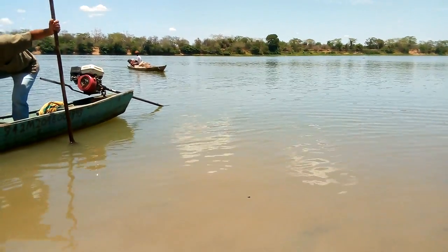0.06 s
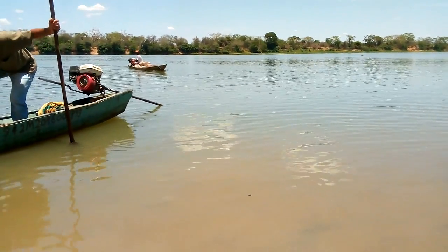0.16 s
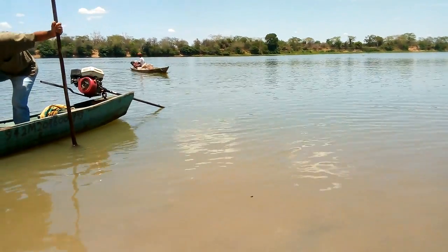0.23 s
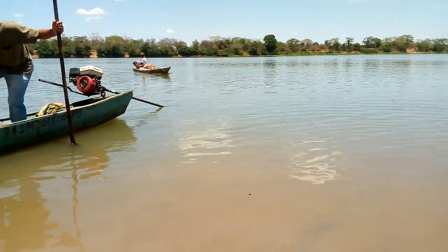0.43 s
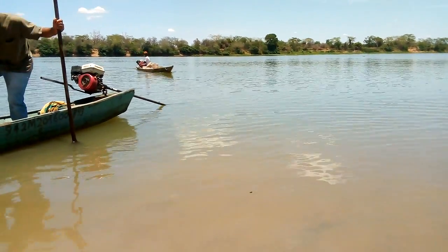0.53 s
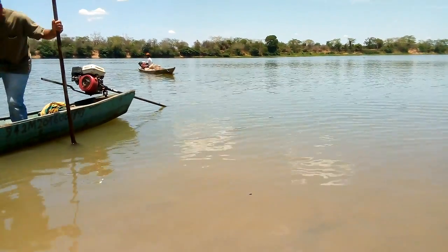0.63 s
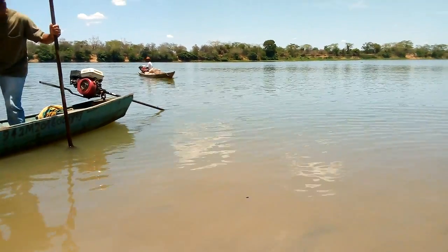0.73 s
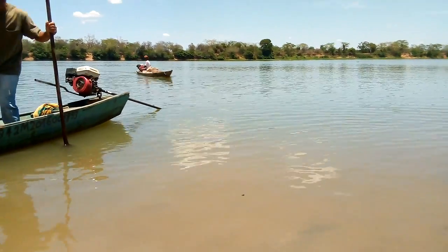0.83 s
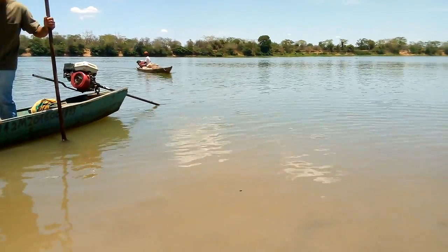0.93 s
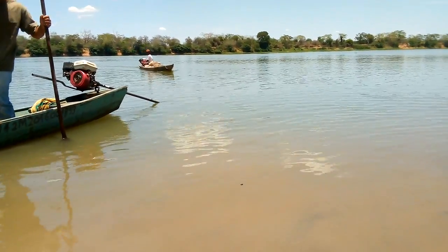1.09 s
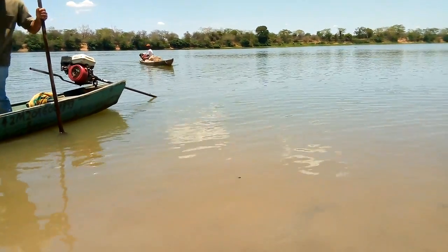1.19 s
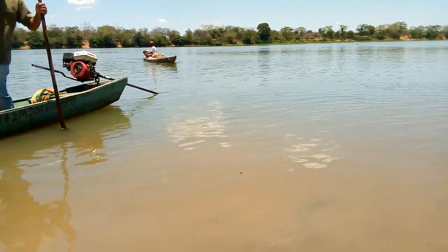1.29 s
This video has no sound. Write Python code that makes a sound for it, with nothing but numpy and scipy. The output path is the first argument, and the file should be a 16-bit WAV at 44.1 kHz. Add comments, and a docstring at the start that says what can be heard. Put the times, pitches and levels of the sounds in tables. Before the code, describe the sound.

A wooden pole knocks a canoe hull, bounces and clatters for a third of a second, then stops; a small motor putters faintly far off, cloth rustles and ticks close to the left of the microphone, outdoors.

```python
"""A wooden pole knocks and bounces against a canoe's hull: short forces excite decaying modes of both. Far out
on the river a small single-cylinder motor putters: puffs of noise ring its casing. Close to the two microphone
ports, mostly left, cloth rustles and ticks: grainy noise and brief rings. A smooth hiss of shaped noise and a
faint bass rumble of the rocking hull lie underneath."""
import sys
import numpy as np
from scipy import signal
from scipy.fft import rfft, irfft
from scipy.io import wavfile
from scipy.ndimage import uniform_filter1d

SR = 44100
rng = np.random.default_rng(int(sys.argv[2]) if len(sys.argv) > 2 else 0)


def generate_wav(signal):
    """Clip the signal to [-1, 1] and save it as 16-bit WAV at the path in sys.argv[1]."""
    frames = np.transpose(np.atleast_2d(signal))
    scaled = np.clip(frames, -1, 1) * 32767
    pcm = np.round(scaled).astype(np.int16)
    wavfile.write(sys.argv[1], SR, pcm)


def to_linear_factor(level_db):
    """Convert decibel levels (scalar or array-like) to linear amplitude factors."""
    exponent = np.asarray(level_db, float) / 20
    return 10 ** exponent


N = 59535  # samples


def noise():
    """White noise: equal mean power at every frequency, unit variance."""
    return rng.standard_normal(N)


def partly_shared_noise(independent, length=N):
    """Partial coherence: both ports share one noise and each adds its own."""
    return rng.standard_normal(length) + independent * rng.standard_normal((2, length))


def band(x, hz, width):
    """Resonant filtering: a two-pole band-pass with gain 1 at the centre."""
    return signal.lfilter(*signal.iirpeak(hz, hz / width, SR), x)


def double_band(x, hz, width1, width2):
    """Cascaded resonance: two band-passes at one centre give steeper skirts."""
    return band(band(x, hz, width1), hz, width2)


def ring(x, hz, t60):
    """Modal decay: a unit impulse starts one damped sinusoid of amplitude 1."""
    r, w = np.exp(-np.log(1000) / (t60 * SR)), 2 * np.pi * hz / SR
    return signal.lfilter([0, r * np.sin(w)], [1, -2 * r * np.cos(w), r * r], x)


def pan(x, db):
    """Interchannel level difference: left minus right in dB, split evenly."""
    return x * to_linear_factor(np.array([[db], [-db]]) / 2)


def fade(t0, t60):
    """Exponential decay: an envelope that jumps to 1 at t0 and falls 60 dB in t60 s."""
    t = np.arange(N) / SR - t0
    return (t >= 0) * np.exp(-np.log(1000) * np.maximum(t, 0) / t60)


def curve(x, rows, log=False):
    """Piecewise-linear interpolation of a two-column table, over log of column 1 if asked."""
    r = np.array(rows, float)
    return np.interp(x, np.log(r[:, 0]) if log else r[:, 0], r[:, 1])


def push(t0, ms):
    """Contact force: a bell of unit area centred on t0; a longer push is duller."""
    p = np.exp(-((np.arange(N) / SR - t0) * 1000 / ms) ** 2 * 2)
    return p / p.sum()


# spectral density of the background hiss at each port; columns: frequency_hz, density_db_per_hz
HISS_LEFT_SPECTRUM = [(30, -114), (100, -109), (220, -99), (350, -103), (800, -100), (1900, -106),
                      (3000, -100), (4500, -100), (5600, -91.5), (6500, -101), (7400, -112), (8000, -128),
                      (9700, -117), (13500, -126), (15200, -114)]
HISS_RIGHT_SPECTRUM = [(30, -116), (100, -112), (220, -103), (350, -105), (800, -101), (1900, -105),
                       (3000, -99), (4200, -100), (5200, -107), (6500, -107), (7400, -116), (8000, -128),
                       (9700, -118), (13500, -126), (15200, -115)]
ALIKE_HZ = 700  # well below this both ports hear nearly the same hiss


def hiss():
    """Partial coherence: hiss is common to the ports at low frequency, independent at high."""
    f = np.maximum(np.fft.rfftfreq(N, 1 / SR), 1)
    same = 1 / (1 + (f / ALIKE_HZ) ** 2)  # share of power in common
    common = rfft(noise())
    ports = []
    for spectrum in (HISS_LEFT_SPECTRUM, HISS_RIGHT_SPECTRUM):
        colour = to_linear_factor(curve(np.log(f), spectrum, log=True)) * np.sqrt(SR / 2)
        mixed = np.sqrt(same) * common + np.sqrt(1 - same) * rfft(noise())
        ports.append(irfft(colour * mixed, N))
    return np.array(ports)


# loudness contour of the rocking boat's low rumble; columns: time_s, level_db
RUMBLE_LEVELS = [(0, -58), (.12, -107), (.24, -94), (.3, -69), (0.442, -68.5), (0.538, -73), (.6, -92)]


def rumble():
    """Narrow-band noise: faint bass, independent at the ports, while the hull rocks."""
    low = double_band(rng.standard_normal((2, N)), 54, 52, 52) * np.sqrt(SR / 90)
    return low * to_linear_factor(curve(np.arange(N) / SR, RUMBLE_LEVELS))


# puffs in one motor cycle; columns: share_of_cycle, level_db
STROKE_PUFFS = [(0, 3.5), (0.221, 1), (0.518, -1), (0.781, 3.5)]
# resonances of the motor casing; columns: frequency_hz, first_filter_width_hz, level_db, left_minus_right_db
CASING_MODES = [(537, 190, -11.5, 4), (856, 55, -3.5, -2.5), (1350, 168, -4, -9.5), (2515, 300, 1.5, -14.5),
                (3440, 240, -4.5, -10.5)]
CASING_GATES = (0.079, 0.9, 0.083, 1.0, 0.39)  # how far each resonance follows the puffs, 0 to 1
FIRING_HZ, FIRING_S = 10.6, 0.982  # firings per second, time of one firing
PUFF_T60_S, PUFF_SCATTER_DB, PUFF_SCATTER_S = 0.033, 4.5, 0.0059  # scatters are standard deviations
CASING_DB, THUD_DB, TAP_DB, TAP_HZ = -66, -44, -54, 7200


def motor():
    """Amplitude modulation: four noise puffs a cycle ring the casing; firings add a thud and a thin tap."""
    puffs, fires = 0.25, 0
    for k in range(-11, 5):
        scatter, s = rng.standard_normal((4, 2)), FIRING_S + k / FIRING_HZ
        fires = fires + fade(s, 0.13)
        for (share, db), (louder, later) in zip(STROKE_PUFFS, scatter):
            start = s + share / FIRING_HZ + PUFF_SCATTER_S * later
            puffs = puffs + to_linear_factor(db + PUFF_SCATTER_DB * louder) * fade(start, PUFF_T60_S)
    puffs = uniform_filter1d(puffs, size=130)  # 3 ms smoothing
    out = np.zeros((2, N))
    for (hz, width, db, lr), gate in zip(CASING_MODES, CASING_GATES):
        breath = partly_shared_noise(hz / 4000) * (1 + gate * (puffs - 1))
        mode = double_band(breath, hz, width, width * 2) * np.sqrt(SR / width)
        out += pan(mode, lr) * to_linear_factor(db + CASING_DB)
    thud = band(noise() * uniform_filter1d(fires, size=600), 170, 140)
    tap = double_band(noise() * fires, TAP_HZ, 1200, 1200)
    out += pan(thud, 6.7) * to_linear_factor(THUD_DB) + pan(tap, 2.5) * to_linear_factor(TAP_DB)
    out[0] = np.roll(out[0], 9)  # reaches the left port 9 samples later
    return out


# thin high ticks; columns: start_s, level_db, t60_s
THIN_TICKS = [(0.083, -66, .05), (0.0928, -55, .003), (0.0928, -58, 0.0044), (0.104, -63.5, 0.005)]


def thin_ticks():
    """Band-limited bursts: decaying noise confined to 10.3-15.6 kHz, strongly to the left."""
    thin = sum(to_linear_factor(db) * fade(s, t60) for s, db, t60 in THIN_TICKS) * noise()
    treble = signal.butter(6, (10300, 15600), "band", fs=SR, output="sos")
    return pan(signal.sosfilt(treble, thin), 36)


# strokes of the cloth; columns: start_s, length_s, scratch_level_db, body_level_db
CLOTH_STROKES = [(0.1043, 0.048, -47, -47.5), (0.17, 0.024, -47, -55.5), (0.214, 0.012, -59, -51.5),
                 (0.397, 0.027, -60, -48), (0.597, 0.011, -70, -48.5), (0.8334, 0.019, -47.5, -48.5),
                 (0.866, 0.02, -42, -54.5), (0.89, 0.087, -46, -53), (1.253, 0.075, -77, -49.5)]
# colour of the cloth; columns: frequency_hz, first_filter_width_hz, level_db, left_minus_right_db
CLOTH_BANDS = [(1000, 940, -7.5, 11.5), (2650, 970, -5, 0), (3800, 810, -2, 3), (5367, 840, -3, 19),
               (6440, 770, -18.5, -2.5)]


def rustles():
    """Frictional noise: random grain roughens each stroke's scratch and body, then bands colour it."""
    t, env = np.arange(N) / SR, 0
    for s, length, scratch_db, body_db in CLOTH_STROKES:
        body = np.clip(np.minimum(t - s, s + length - t) / length * 3, 0, 1)
        env = env + to_linear_factor(scratch_db) * fade(s, 0.045) + to_linear_factor(body_db) * body
    grain = to_linear_factor(1.9 * uniform_filter1d(noise(), size=80) * np.sqrt(80))  # 1.9 dB scatter
    out = np.zeros((2, N))
    for hz, width, db, lr in CLOTH_BANDS:
        rough = env * grain * partly_shared_noise(1.52)
        out += pan(double_band(rough, hz, width, width * 2), lr) * to_linear_factor(db)
    return out


# ticks of the cloth; columns: start_s, dull_hz, dull_level_db, sharp_level_db, left_minus_right_db
CLOTH_TICKS = [(0.186, 523, -38.5, -35, 19), (0.353, 3940, -37, -84.5, -37), (0.528, 880, -22, -30, 22),
               (.581, 2000, -52, -36, 27), (0.59, 884, -28.5, -48.5, 22.5), (.691, 1880, -39.5, -73, -3),
               (0.7138, 1000, -29, -39, 21.5), (0.728, 1000, -43.5, -37.5, 23), (0.909, 3300, -40, -43, 16)]
SHARP_HZ = 4940


def ticks():
    """Impulse response: brief pushes ring a dull mode, differentiated, and a sharp mode."""
    out = np.zeros((2, N))
    for s, hz, dull_db, sharp_db, lr in CLOTH_TICKS:
        slope = np.gradient(ring(push(s + 0.0004, 0.14), hz, 0.0054)) * SR / (2 * np.pi * hz)
        dull = band(slope, hz, hz * 3.1)
        sharp = ring(push(s + 0.00092, 0.07), SHARP_HZ, 0.0019)
        out += pan(to_linear_factor(dull_db) * dull + to_linear_factor(sharp_db) * sharp, lr)
    return out


# knocks of pole on hull; columns: start_s, hull_db, note_db, clack_db, push_ms, chatter_t60_ms
KNOCK_EVENTS = [(.0005, -28, -71, -60, 0.33, 16), (.051, -32, -45, -62, 0.37, 137),
                (0.2449, -25, -52, -16.5, 0.052, 33), (0.2465, -12.5, -39, -22, 0.21, 15),
                (0.2506, -14.5, -11, -22.5, 0.05, 22.3), (0.3243, -24, -7.5, -24, 0.16, 57),
                (0.3873, -28.5, -9.5, -36.5, 0.067, 84), (0.4102, -18, -15, -17, 0.14, 6.7),
                (0.414, -18, -14, -12, .15, 9.8), (.436, -28, -15, -27, 0.31, 62),
                (0.479, -26.5, -24, -29.5, 0.2, 40), (0.4958, -32.5, -10.5, -15, 0.19, 4.1),
                (.503, -31.5, -20, -34.5, 0.11, 52), (.545, -32.5, -37, -29, 0.22, 9.7)]
CHATTER_DB = -5  # rough contact that follows each push


def knock_forces():
    """Impact excitation: a smooth push and rough chatter; rows drive the hull, the note and the clack."""
    forces = 0
    for s, *dbs, ms, t60_ms in KNOCK_EVENTS:
        soft = push(0.002, ms)[:177]  # gives the chatter the push's dullness
        chatter_env = fade(s, t60_ms / 1000) - fade(s, 0.01)
        rough = np.convolve(chatter_env * noise(), soft, "same")
        rough *= np.linalg.norm(soft) / np.linalg.norm(rough)
        force = push(s + ms / 1000, ms) + to_linear_factor(CHATTER_DB) * np.sqrt(t60_ms / 20) * rough
        forces = forces + to_linear_factor(np.array(dbs))[:, None] * force
    return forces


# contour of the pole dragging on the wood between knocks; columns: time_s, level_db
DRAG_LEVELS = [(.03, -43.5), (.08, -71), (.11, -80), (.3, -45.5), (.36, -37.5), (.43, -32), (.5, -33.5),
               (.55, -36.5), (.6, -58.5)]


def drag_force():
    """Frictional excitation: sparse random impulses, band-limited, follow the drag contour."""
    grains = noise() * (rng.random(N) < 0.02)
    return to_linear_factor(curve(np.arange(N) / SR, DRAG_LEVELS)) * band(band(grains, 1270, 1100), 580, 2500)


# dense small modes of the planks; columns: frequency_hz, level_db, t60_s
PLANK_BANDS = [(151, -28.5, 0.47), (296, -28, 0.046), (490, -25.5, 0.17), (2354, -11, 0.073),
               (3600, -11, 0.0143)]
PLANK_PAN_DB = -3  # left minus right, per octave above 700 Hz


def planks(forces):
    """High modal density: many small modes act as decaying noise, convolved with the knock force."""
    u, out = np.arange(SR // 5) / SR, np.zeros((2, N))
    for hz, db, t60 in PLANK_BANDS:
        wood = partly_shared_noise(min(hz / 2500, 1), len(u))
        tail = double_band(wood, hz, hz * 1.02, hz * 1.02) * np.sqrt(SR / hz)
        tail = tail * np.exp(-np.log(1000) * u / t60)
        force = forces[2 if hz > 2000 else 0]  # clack above 2 kHz, hull below
        answer = signal.fftconvolve(force[None], tail, axes=1)[:, :N]
        out += pan(answer, PLANK_PAN_DB * np.log2(hz / 700)) * to_linear_factor(db)
    return out


# ring of the hull; columns: frequency_hz, level_db, t60_s, left_minus_right_db
HULL_MODES = [(320, -22.5, 0.14, -1.5), (442.5, -6, 0.033, 1), (592, -17.5, 0.16, 0),
              (638, -12.5, 0.089, 11), (758.4, -13, 0.13, 2), (1053, -3.5, 0.023, 0), (709, -5.5, 0.023, 2),
              (1146, -14, 0.1, 2), (1449, -11, 0.079, 10.5), (1442, 4, 0.026, 1)]
# low ring of the pole's length; columns: frequency_hz, level_db, t60_s, left_minus_right_db
NOTE_MODES = [(950, -13, 0.13, -1.5)]
# clack of the pole's end; columns: frequency_hz, level_db, t60_s, left_minus_right_db
POLE_MODES = [(1818, -17, 0.051, -10), (2080, -10.5, 0.081, -9.5), (2308, -7.5, 0.052, -10),
              (2401, -4, 0.041, -14), (2692, -8, 0.053, -12), (3058, -8.5, 0.035, -14.5),
              (3260, -9.5, 0.026, -20), (3664, -9.5, 0.04, -19), (3840, -10.5, 0.037, -16.5)]
LAG_MS, EDGE_HZ = 0.28, 3480  # left port hears the boat later; the boat gives little above the edge


def boat():
    """Modal superposition: knocks excite hull, pole and planks; drag excites hull and pole only."""
    forces, drag = knock_forces(), drag_force()
    out = planks(forces)
    for force, rub, modes in ((forces[0], drag, HULL_MODES), (forces[1], drag, NOTE_MODES),
                              (forces[2], to_linear_factor(-3.0) * drag, POLE_MODES)):
        for k, (hz, db, t60, lr) in enumerate(modes):
            drive = force + rub * t60 * 10  # dragging feeds the lasting modes most
            out += (-1) ** k * pan(ring(drive, hz, t60), lr) * to_linear_factor(db)  # successive rows alternate in sign
    out[0] = np.roll(out[0], round(LAG_MS * SR / 1000))
    return signal.sosfilt(signal.cheby1(4, 1, EDGE_HZ, fs=SR, output="sos"), out)


PORT_LOW_HZ, PORT_TOP_HZ = 188, 7470  # band that the microphone ports pass


def scene():
    """Linear superposition: the ports band-limit boat, motor and cloth; the other layers add directly."""
    low_cut = signal.butter(3, PORT_LOW_HZ, "high", fs=SR, output="sos")
    high_cut = signal.cheby1(8, 1, PORT_TOP_HZ, fs=SR, output="sos")
    through_ports = signal.sosfilt(np.r_[low_cut, high_cut], motor() + rustles() + ticks() + boat())
    return hiss() + rumble() + thin_ticks() + through_ports


def top_cut(x):
    """Nothing passes above the cut-off."""
    return signal.sosfilt(signal.butter(12, 15350, fs=SR, output="sos"), x)


def record(dry):
    """Signal chain: the finished mix passes through one last stage."""
    return top_cut(dry)


dry = scene()
out = record(dry)
generate_wav(out)
```